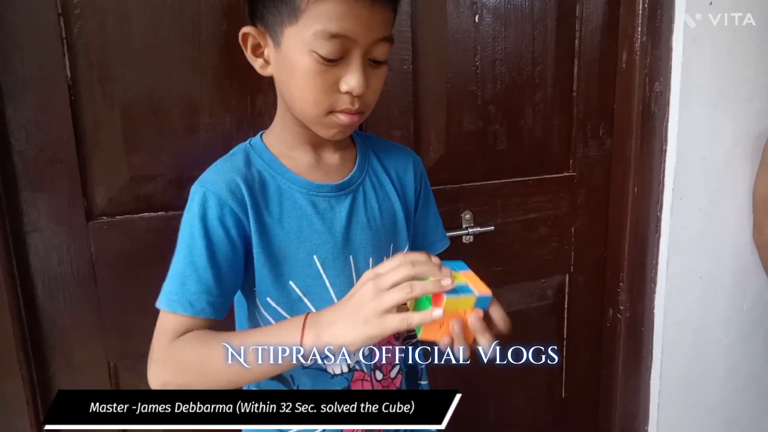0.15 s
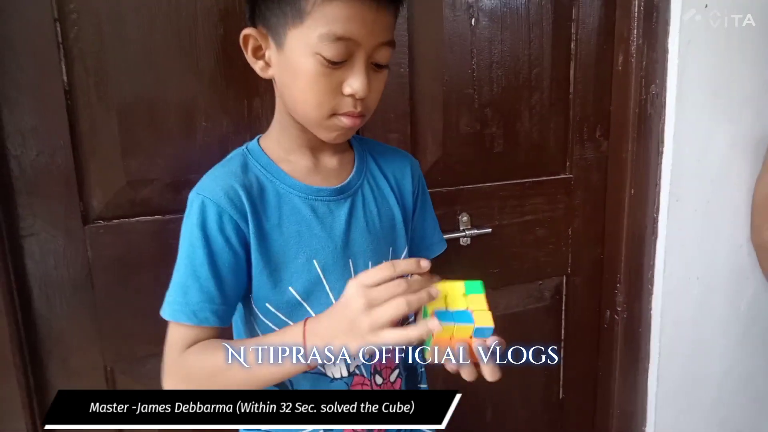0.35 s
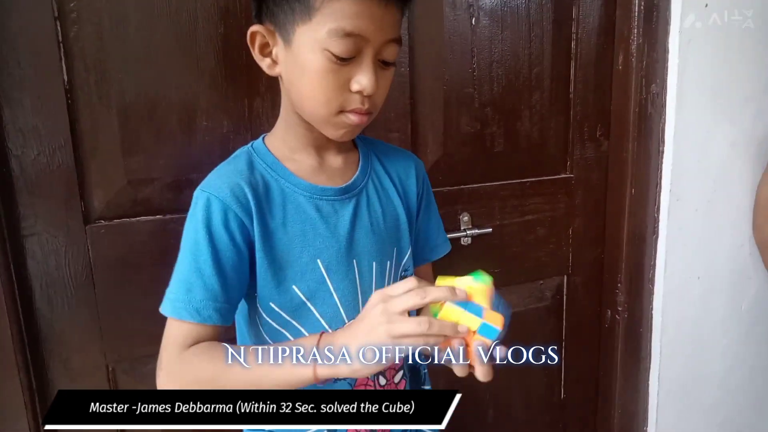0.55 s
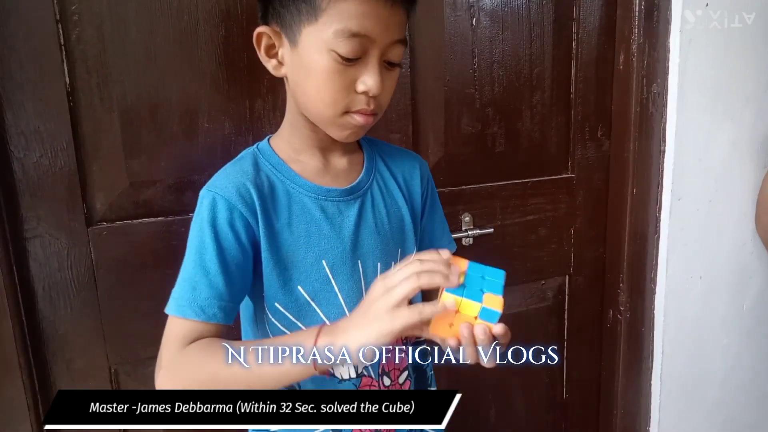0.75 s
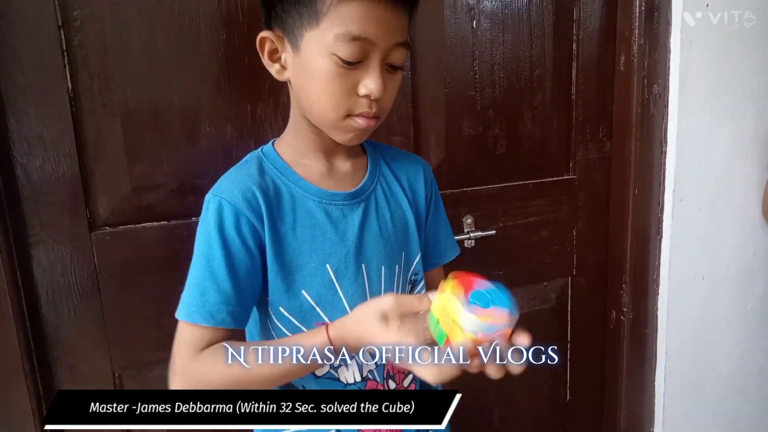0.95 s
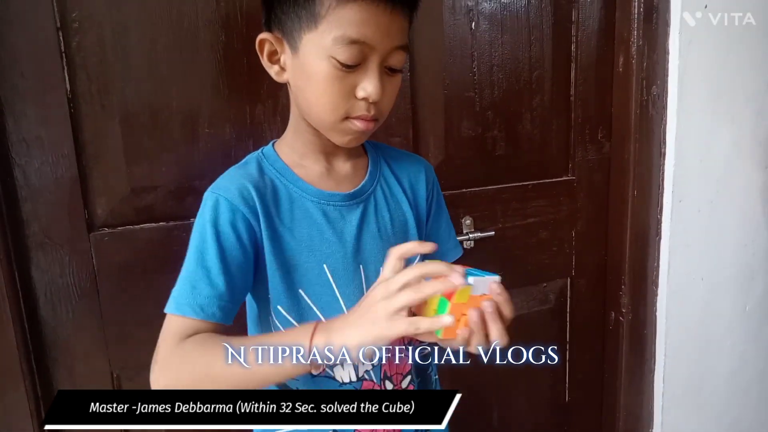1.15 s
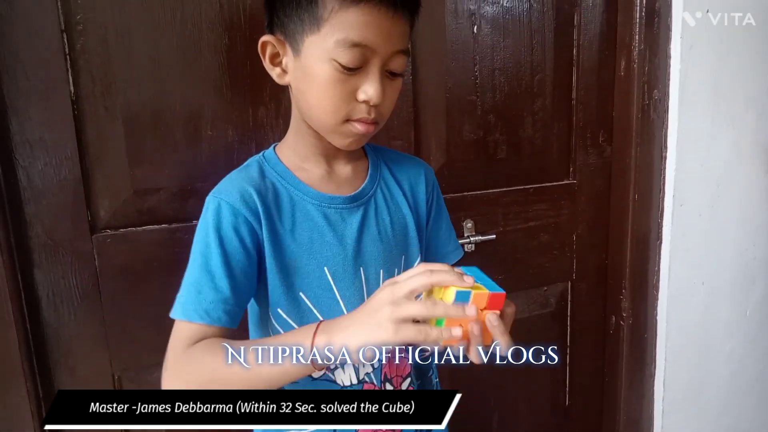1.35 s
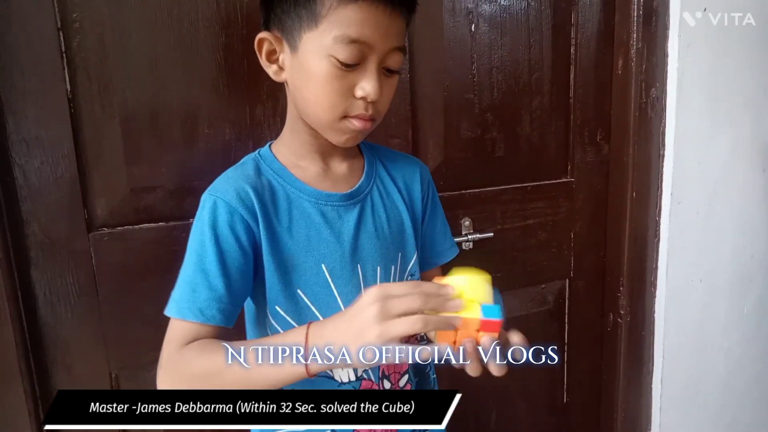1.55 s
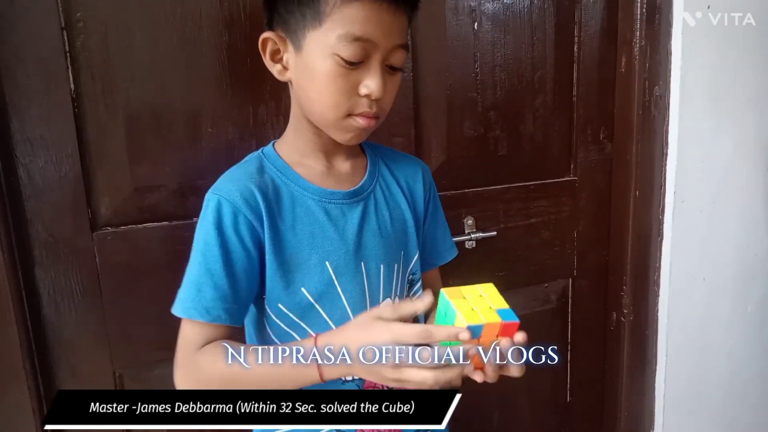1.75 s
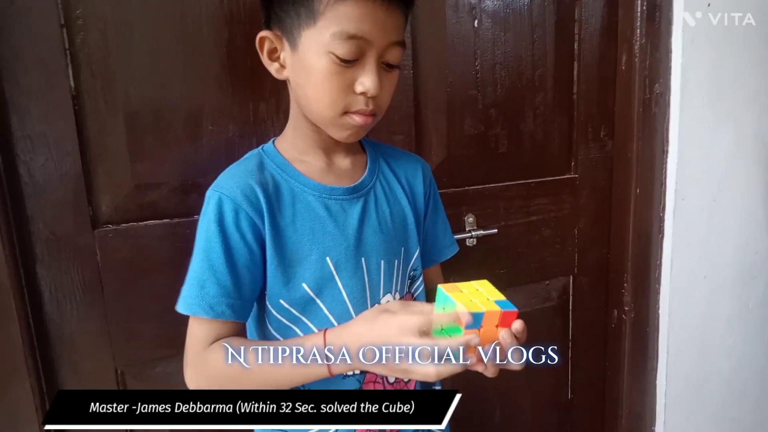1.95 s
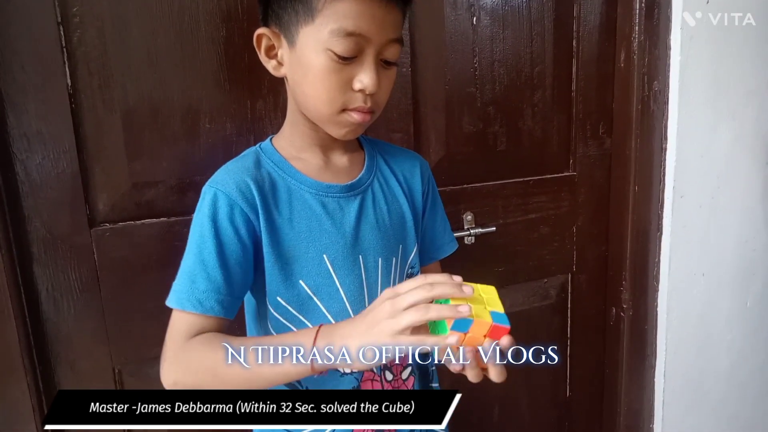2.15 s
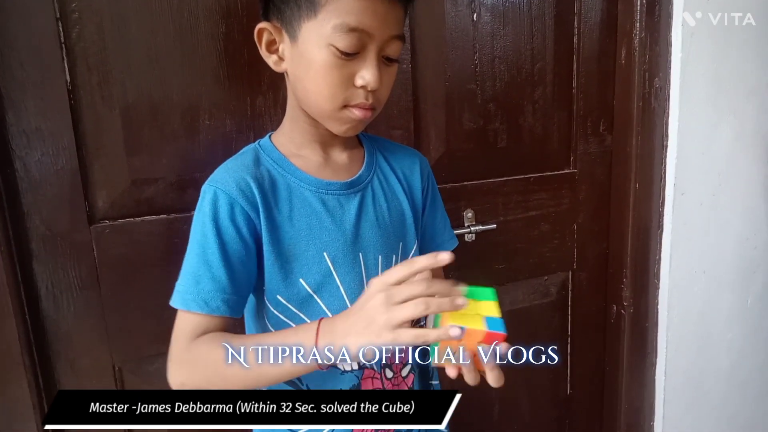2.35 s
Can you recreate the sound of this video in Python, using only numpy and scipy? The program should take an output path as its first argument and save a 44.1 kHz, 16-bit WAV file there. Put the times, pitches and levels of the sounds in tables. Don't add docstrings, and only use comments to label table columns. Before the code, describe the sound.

Hands twist a plastic puzzle cube close to a phone: scrapes, ticks and sharp snaps in irregular bursts, loudest near 0.8 seconds, in a small hard room with faint traffic hum, insect buzz and bird whistles.

```python
import sys
import numpy as np
from scipy import signal
from scipy.io import wavfile
from scipy.ndimage import uniform_filter1d

SR = 44100
rng = np.random.default_rng(int(sys.argv[2]) if len(sys.argv) > 2 else 0)


def wav_out(sig):
    wavfile.write(sys.argv[1], SR, np.round(np.clip(np.atleast_2d(sig).T, -1, 1) * 32767).astype(np.int16))


def amplitude_ratio(level_db):
    exponent = np.asarray(level_db, float) / 20
    return 10 ** exponent


N = 105840

# f/Hz, width/Hz, level/dB
PIECES = [(800, 77, -8.5), (2140, 240, -5), (3380, 120, -35), (3690, 23, 12.5), (4370, 90, 3),
          (4930, 140, -60), (6060, 200, -4.5), (6770, 500, -5), (7650, 300, -5.5), (7670, 32, -58.5),
          (8710, 180, -3), (9500, 120, -19)]


def evened(x):
    return x / np.sqrt(np.mean(x ** 2) + 1e-20)


def read(points, hz):
    f, value = np.transpose(points)
    return np.interp(np.log(hz + 1), np.log(f + 1), value)


def add(mix, s, sound):
    part = mix[round(s * SR):][:len(sound)]
    part += sound[:len(part)]


def background(gain_db, patch_db, size):
    hz = np.fft.rfftfreq(size, 1 / SR)
    frames = 4 * N // size + 5
    a, b, patches = rng.standard_normal((3, len(hz), frames))
    patches = uniform_filter1d(patches, size=6, axis=0)
    patches = evened(uniform_filter1d(patches, size=10, axis=1))
    z = (a + 1j * b) * amplitude_ratio(read(gain_db, hz)[:, None] + patch_db * patches)
    return evened(signal.istft(z, nperseg=size, noverlap=3 * size // 4)[1][:N])


def traffic_hum():
    # f/Hz, level/dB
    hum_curve = [(15, -48), (25, -11), (95, 4.5), (232, -6.5), (782, -9), (897, -14.5), (1100, -10),
                 (1350, -16.5), (1500, -9), (1950, -62), (3300, -120)]
    return amplitude_ratio(-56) * background(hum_curve, patch_db=2.2, size=2048)


def outdoor_air():
    # f/Hz, level/dB
    air_curve = [(880, -22), (1500, -47), (1660, -11.5), (2120, -3), (2320, 3), (3480, 3.5), (5440, -27.5),
                 (8830, -16), (16000, -53)]
    sway_db, sway_s = 1.2, 0.12
    span = round(sway_s * SR)
    sway = uniform_filter1d(rng.standard_normal(N), span)
    sway = evened(uniform_filter1d(sway, span))
    return amplitude_ratio(-50.5 + sway_db * sway) * background(air_curve, patch_db=0.5, size=512)


def insect():
    buzz_hz, width_hz, sway_hz = 8930, 450, 130
    throb_hz, throb_db, level_db = 3.0, 3.5, -65.5
    turn = 2 * np.pi * throb_hz * (np.arange(N) / SR - 0.25)
    b, a = signal.butter(2, width_hz / 2, fs=SR)
    band = signal.lfilter(b, a, rng.standard_normal((2, N)))
    phase = 2 * np.pi * np.cumsum(buzz_hz + sway_hz * np.sin(turn)) / SR
    buzz = evened(band[0] * np.cos(phase) + band[1] * np.sin(phase))
    return buzz * amplitude_ratio(level_db + throb_db * np.sin(turn))


def causal(gain_db):
    both_sides = np.r_[gain_db, gain_db[-2:0:-1]]
    full = np.log(amplitude_ratio(np.maximum(both_sides, -100)))
    response = np.fft.ifft(np.exp(full - 1j * signal.hilbert(full).imag)).real
    return response[:len(gain_db) // 2]


def cube_body(bright, shift, ring_hz=None):
    # f/Hz, level/dB
    colour = [(120, -35.5), (200, -22.5), (836, -11.5), (1320, -12), (3310, 3.5), (5330, -10.5),
              (8740, -13.5), (14900, -26), (16000, -36)]
    ring_db, detune, damping = -5, 0.037, 2.2
    main_db, main_width_hz = 4.5, 300
    tilt_db, tilt_hz, low_tilt = -7, 3000, 0.43
    hz = np.fft.rfftfreq(2048, 1 / SR)
    f, width, db = np.transpose(PIECES)
    over = amplitude_ratio(db - read(colour, f) + ring_db)
    off_pitch = 2 * (hz[:, None] - f * (1 + detune * shift)) / (damping * width)
    peaks = (over ** 2 / (1 + off_pitch ** 2)).sum(1)
    if ring_hz:
        peaks = peaks + amplitude_ratio(2 * main_db) / (1 + (2 * (hz - ring_hz) / main_width_hz) ** 2)
    octaves = np.log2((hz + 200) / tilt_hz)
    octaves = np.where(octaves > 0, octaves, low_tilt * octaves)
    tilt = tilt_db * (2 * bright - 1) * octaves
    h = causal(read(colour, hz) + 10 * np.log10(1 + peaks) - tilt)
    return h / np.linalg.norm(h)


def random_shift():
    return rng.uniform(-1, 1, len(PIECES))


def sparse(count, knocks_per_s, spread_db):
    chance = knocks_per_s / SR
    draw = rng.random(count)
    size = np.minimum(rng.exponential(1, count), 2.6)
    return evened((draw < chance) * np.sign(draw / chance - 0.5) * amplitude_ratio(spread_db * size))


def scrape():
    # t/s, level/dB
    pressure = [(0.0, -59), (.1, -57), (.16, -65.5), (0.27, -54), (.33, -58.5), (0.41, -54), (0.56, -49),
                (.64, -54.5), (0.73, -57), (0.86, -50.5), (.98, -63.5), (1.2, -66), (1.48, -55.5),
                (1.62, -53), (1.74, -66), (1.9, -60), (2.2, -61), (2.4, -70)]
    slips = sparse(N, 2500, spread_db=3)
    slips *= amplitude_ratio(4 + np.interp(np.arange(N) / SR, *np.transpose(pressure)))
    return signal.oaconvolve(slips, cube_body(0.1, 0))[:N]


def clicks(table, level_db):
    rise_s, crack_level, crack_s = 0.0009, 1.16, 0.00056
    lead_db, lead_s = -14.5, 0.0082
    out = np.zeros(N)
    t = np.arange(3600) / SR - 0.02
    after = np.maximum(t, 0)
    lead = amplitude_ratio(lead_db) * np.exp(-abs(t) / lead_s)
    crack_shape = crack_level * np.exp(-abs(t - rise_s) / crack_s)
    for s, db, length, bright, *ring in table:
        shift = random_shift()
        crack = rng.standard_normal(len(t)) * crack_shape
        shape = lead + (1 - np.exp(-after / rise_s)) * np.exp(-after / length)
        rattle = shape * sparse(len(t), 4200, spread_db=2.8)
        burst = np.convolve(crack, cube_body(bright, shift))
        burst += np.convolve(rattle, cube_body(bright - 0.12, shift, *ring))
        start = s + t[0] - rise_s / 2
        missed = max(round(-start * SR), 0)
        add(out, max(start, 0), amplitude_ratio(db + level_db) * burst[missed:])
    return out


def ticks():
    # t/s, level/dB, rattle length/s, brightness/0-1
    catches = [(0.0024, -22, 0.006, 0.25), (0.0433, -30, 0.018, 0.2), (0.0656, -28.5, 0.03, 0),
               (0.0783, -23.5, 0.0088, 0.13), (0.103, -30.5, 0.013, 0.6), (0.2473, -25.5, 0.022, 0.16),
               (0.3445, -23.5, 0.014, 0.28), (0.3718, -20, 0.025, 0.1), (0.445, -20, 0.0079, 0.17),
               (0.4995, -22.5, 0.006, 0.5), (0.7785, -20.5, 0.0091, 0), (1.071, -23.5, 0.0096, 0.13),
               (1.0812, -26, 0.026, 0.1), (1.1354, -22, 0.01, 0), (1.2026, -31.5, 0.0069, 0.36),
               (1.243, -31.5, 0.013, 0.27), (1.3522, -24.5, 0.015, 0.08), (1.436, -25, 0.011, 0.05),
               (1.49, -26.5, 0.017, 0), (1.566, -21, 0.022, 0.24), (1.5956, -30.5, 0.019, 0.26),
               (1.6244, -29.5, 0.016, 0), (1.7734, -40, 0.021, 0.3), (1.8482, -22.5, 0.029, 0.27),
               (1.883, -24.5, 0.0049, 0.27), (2.0033, -31.5, 0.013, 0), (2.0366, -33.5, 0.0091, 0),
               (2.0582, -24, 0.0045, 0.55), (2.0795, -22, 0.0053, 0)]
    return clicks(catches, -12.5)


def taps():
    # t/s, level/dB, brightness/0-1, ring f/Hz
    tap_table = [(0.0116, -37, 0, 2960), (0.0705, -31, 0.3, 3750), (0.2152, -20.5, 0.27, 3250),
                 (0.3806, -30, 0.1, 3320), (0.4076, -16.5, 0.26, 2350), (0.4146, -14.5, 0.1, 3530),
                 (0.5166, -28, 0.2, 2430), (0.5472, -27, 0, 3360), (0.564, -13, 0.4, 3420),
                 (0.5888, -17.5, 0.13, 3380), (0.7831, -20, 0, 3010), (0.7978, -17, 0.1, 3770),
                 (0.8079, -24, 0.1, 2950), (0.8123, -14, 0.6, 3270), (0.8175, -15, 0, 3170),
                 (0.8224, -17.5, 0.6, 3250), (0.8358, -35, 0.4, 3210), (1.1227, -21, 0.2, 3210),
                 (1.1254, -24, 0.33, 2940), (1.1593, -34, 0.8, 3060), (1.3888, -24.5, 0.2, 2670),
                 (1.4389, -35, 0.7, 3880), (1.5357, -27, 0.7, 3010), (1.5387, -33, 0.6, 3480),
                 (1.5498, -22, 0.1, 2990), (1.5595, -41, 0.0, 2800), (1.5725, -20, 0.6, 4390),
                 (1.5763, -23, 0, 2000), (1.5979, -31, 0.6, 3270), (1.61, -20.5, 0.27, 3170),
                 (1.6267, -36, 0.5, 2780), (1.8017, -15, 0.9, 3200), (1.8077, -12.5, 0.4, 2690),
                 (1.8157, -18, 0.4, 2780), (1.8299, -25, 0.3, 2820), (1.8339, -32, 0.5, 2430),
                 (2.068, -18, 0.15, 2920), (2.0741, -19.5, 0.55, 3100), (2.0849, -22, 0.64, 3420),
                 (2.0885, -22, 0, 3530), (0.1934, -25, 0.4, 3300), (0.1994, -27, 0.6, 3000),
                 (0.2497, -27, 0.1, 3200), (0.347, -35, 0.4, 3300)]
    out = np.zeros(N)
    t = np.arange(60) / SR
    for s, db, bright, ring_hz in tap_table:
        hit = rng.standard_normal(len(t)) * np.exp(-t / 0.00027)
        knock = np.convolve(hit, cube_body(bright, random_shift(), ring_hz))
        add(out, s, amplitude_ratio(db + 5.5) * knock / np.linalg.norm(knock))
    return out


def snaps():
    # t/s, level/dB, rattle length/s, brightness/0-1, ring f/Hz
    snap_table = [(0.1782, -23.5, 0.023, 0.31, 3300), (0.2125, -20.5, 0.013, 0.44, 3030),
                  (0.3874, -12, 0.013, 0.41, 3000), (0.5098, -18, 0.012, 0.27, 3870),
                  (0.5426, -10, 0.015, 0.57, 3370), (0.7644, -19.5, 0.01, 0.24, 3780),
                  (0.7944, -1.5, 0.0046, 0.64, 3070), (1.1116, -19, 0.018, 0.21, 3030),
                  (1.3839, -21, 0.012, 0.26, 2560), (1.5098, -7.5, 0.0053, 0.5, 3690),
                  (1.7936, -11.5, 0.014, 0.38, 3900), (2.064, -20.5, 0.022, 0.2, 3000),
                  (2.0832, -14.5, 0.0087, 0.42, 2570),
                  (0.116, -29.5, 0.0074, 0, 3270), (0.322, -32.5, 0.0047, 0.04, 3000),
                (0.391, -13, 0.0031, 0.73, 3000), (0.404, -20, 0.0094, 0, 2620),
                (0.5558, -10, 0.0058, 0.63, 3650), (0.801, -10.5, 0.012, 0.56, 2640),
                (1.118, -21.5, 0.017, 0.47, 3150), (1.5199, -13.5, 0.01, 0.32, 3000),
                (1.675, -35, 0.006, 0.2, 3800), (1.734, -34, 0.0065, 0, 3000),
                (1.804, -16, 0.009, 0.64, 2560), (2.0945, -19, 0.0029, 0.02, 2580),
                (2.115, -20.5, 0.0062, 0.47, 3460)]
    return clicks(snap_table, -10)


def thuds(table):
    out = np.zeros(N)
    t = np.arange(4000) / SR
    for s, db, hz, t60 in table:
        shape = amplitude_ratio(db - 60 * t / t60) * (1 - np.exp(-t / 0.00074))
        add(out, s, shape * np.sin(2 * np.pi * hz * t))
    return out


def core_thumps():
    # t/s, level/dB, f/Hz, t60/s
    thumps = [(.179, -26.5, 1220, 0.012), (.388, -28, 768, 0.032), (.389, -24.5, 1193, 0.025),
              (.511, -32.5, 1195, 0.032), (.765, -31, 755, 0.015), (1.352, -44.5, 768, 0.068),
              (1.795, -28, 833, 0.085), (1.51, -27, 1155, 0.03), (1.8, -36, 740, 0.055),
              (.794, -44, 520, 0.057), (.794, -33, 1114, .05), (.794, -25, 1438, 0.045),
              (.81, -53, 850, 0.053), (.544, -36, 693, 0.033), (.544, -37, 2320, 0.067),
              (1.511, -24.5, 2150, 0.047), (1.797, -29.5, 2080, 0.14), (2.08, -33.5, 808, 0.058)]
    return thuds(thumps)


def bird():
    # start t/s, length/s, first f/Hz, last f/Hz, level/dB
    whistles = [
        (.285, .045, 2600, 2780, -45),
        (.44, .09, 2200, 2460, -39.5),
        (.6, .085, 2400, 2330, -47),
        (.927, .117, 3950, 1950, -46),
        (1.292, .088, 3950, 2280, -39),
        (1.652, .108, 3950, 2150, -44.5),
        (1.83, .06, 3300, 2400, -49),
    ]
    sweet_hz, sweet_width_hz, sweet_db = 3060, 170, 8
    flutter_hz, flutter = 344, 0.52
    out = np.zeros(N)
    for s, length, first_hz, last_hz, db in whistles:
        t = np.arange(0, length, 1 / SR)
        hz = first_hz * (last_hz / first_hz) ** (t / length)
        shape = np.sqrt(np.sqrt(np.sin(np.pi * t / length)))
        boost_db = sweet_db * np.exp(-((hz - sweet_hz) / sweet_width_hz) ** 2)
        add(out, s, shape * amplitude_ratio(db + boost_db) * np.sin(2 * np.pi * np.cumsum(hz) / SR))
    gap = np.zeros(round(SR / flutter_hz) - 1)
    return signal.lfilter([1 - flutter / 2], np.r_[1, gap, -flutter], out)


def phone_nudge():
    # t/s, level/dB, f/Hz, t60/s
    bumps = [
        (1.974, -41, 320, 0.018),
        (1.974, -27, 195, 0.012),
        (1.983, -36.5, 99, 0.042),
    ]
    return thuds(bumps)


def room(x):
    # f/Hz, t60/s
    ring_time = [(300, 0.69), (800, 0.23), (2100, 0.31), (4300, 0.23), (5500, 0.21), (12000, 0.22)]
    echoes = np.zeros(SR // 2)
    at = np.arange(round(0.004 * SR), SR // 2 - 20, 20)
    echoes[at + rng.integers(0, 20, len(at))] = rng.choice([-1.0, 1.0], len(at))
    hz, t, z = signal.stft(echoes, SR, nperseg=256)
    decay = amplitude_ratio(-60 * t / read(ring_time, hz)[:, None])
    tail = signal.istft(z * decay, SR, nperseg=256)[1]
    return signal.fftconvolve(x, tail / np.linalg.norm(tail))[:N]


def scene():
    outdoors = traffic_hum() + outdoor_air() + insect()
    cube = scrape() + ticks() + taps() + snaps() + core_thumps()
    whistle = bird()
    wet = room(amplitude_ratio(-8.5) * cube + amplitude_ratio(-7) * whistle)
    return (outdoors + cube + whistle + wet + phone_nudge())[None]


def band_limit(x):
    return signal.sosfilt(signal.butter(12, 16450, fs=SR, output="sos"), x)


def record(dry):
    low_cut = signal.butter(3, 50, "high", fs=SR, output="sos")
    high_cut = signal.firwin(767, 15650, window=("kaiser", 9), fs=SR)
    x = signal.sosfilt(low_cut, dry)
    x = signal.oaconvolve(x, high_cut[None], "same")
    return band_limit(x)


dry = scene()
out = record(dry)
wav_out(out)
```